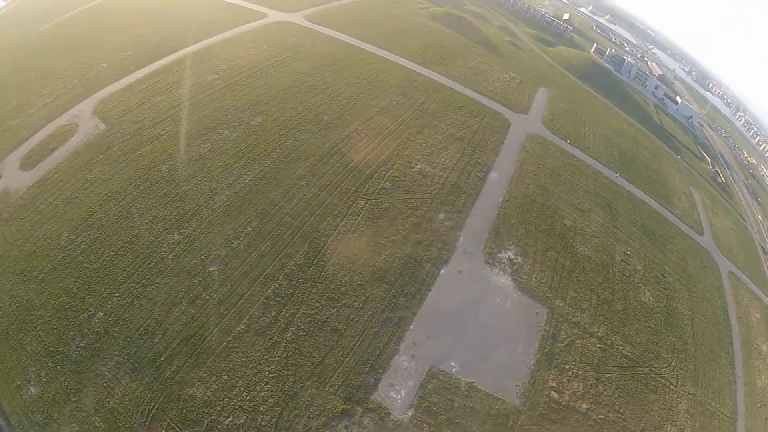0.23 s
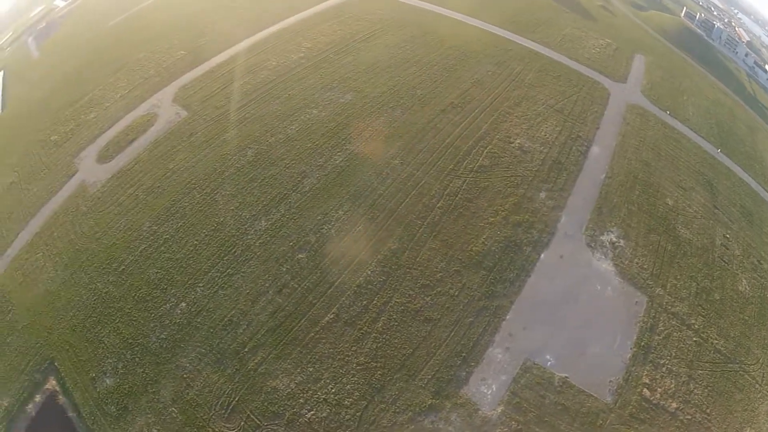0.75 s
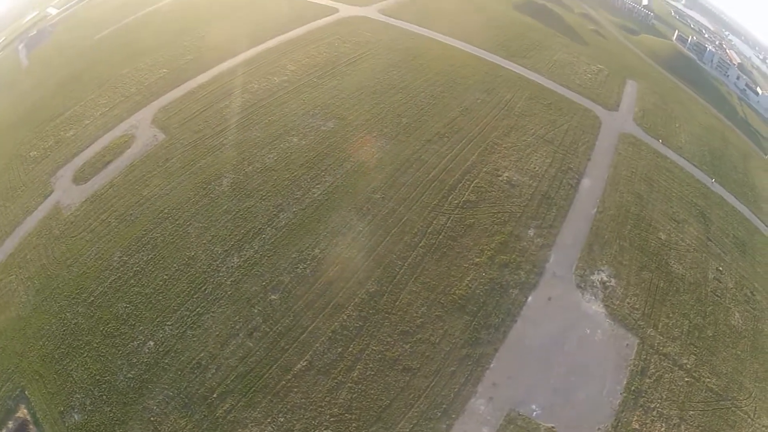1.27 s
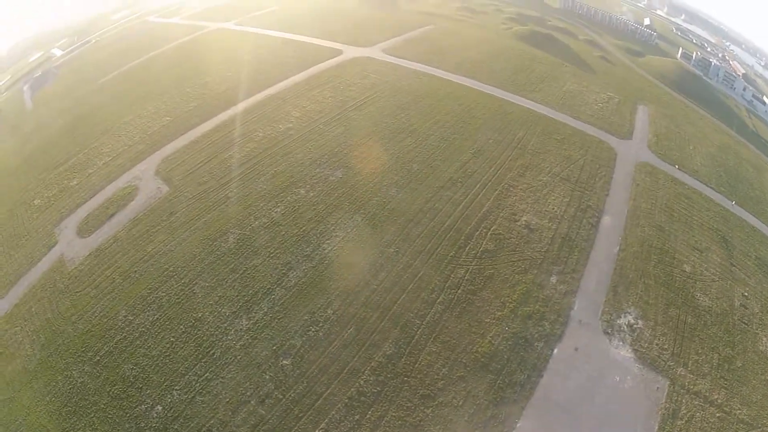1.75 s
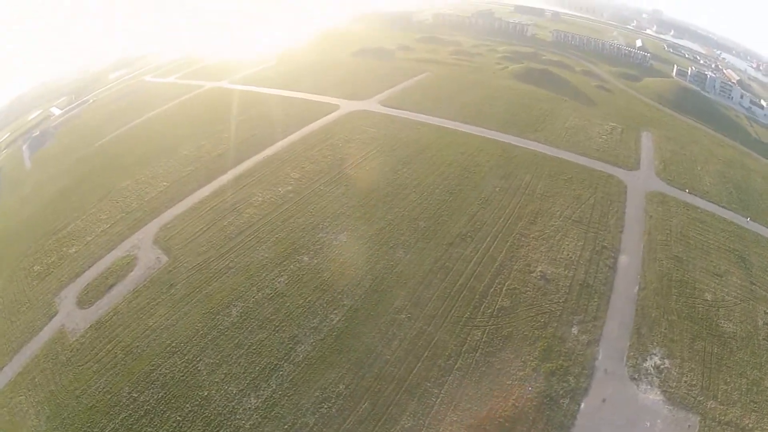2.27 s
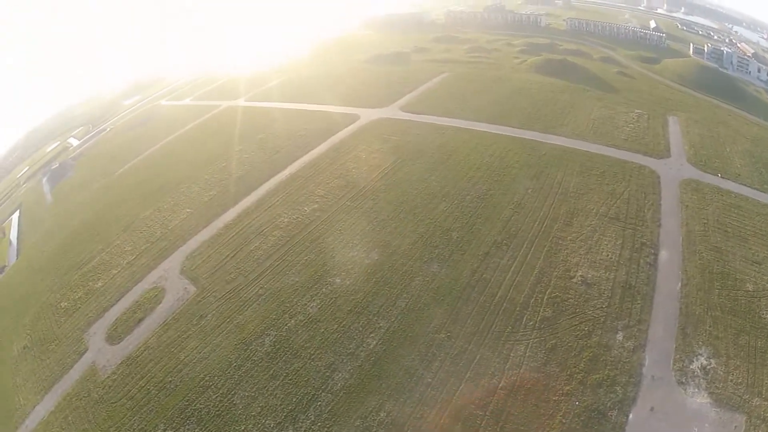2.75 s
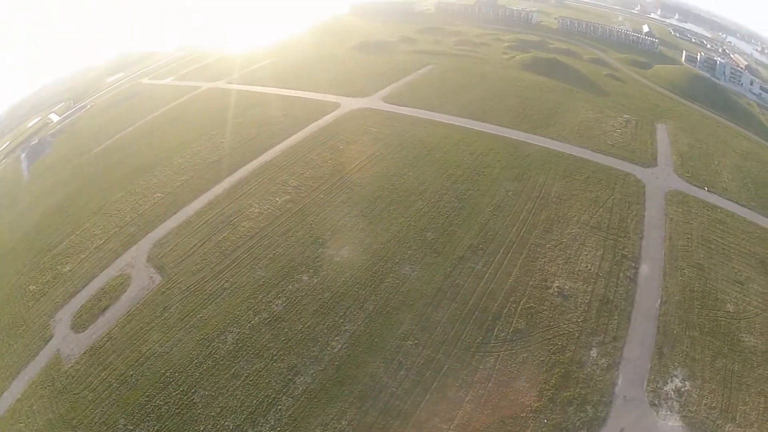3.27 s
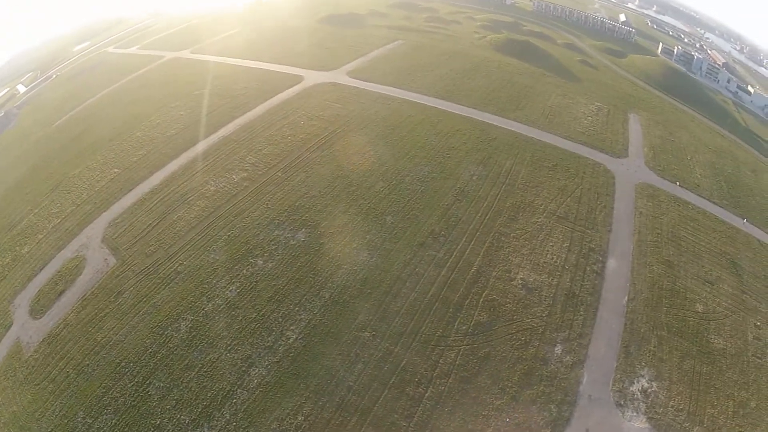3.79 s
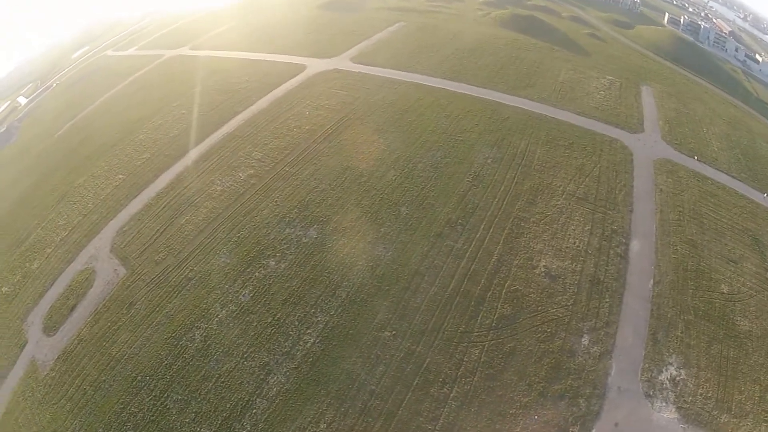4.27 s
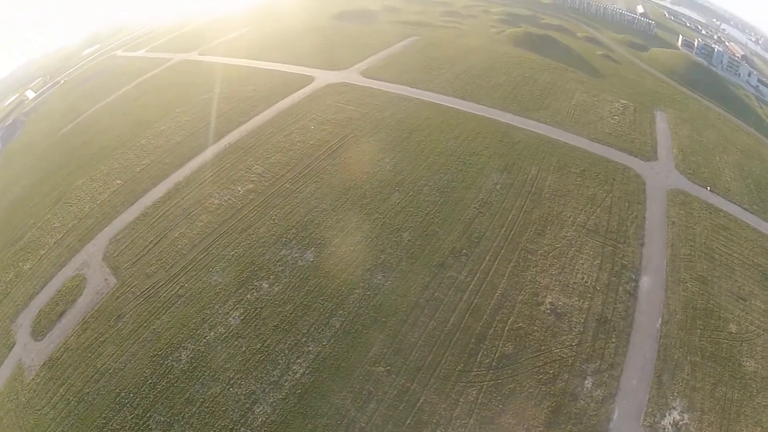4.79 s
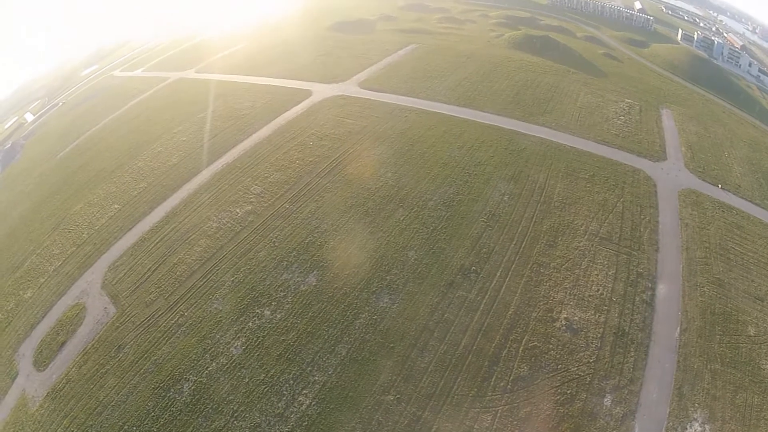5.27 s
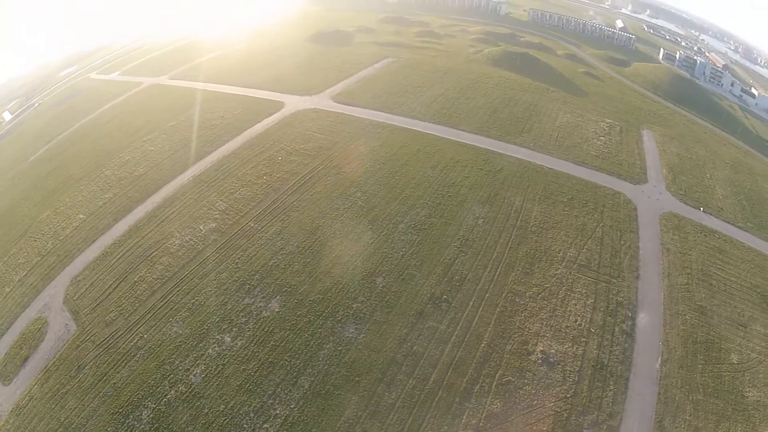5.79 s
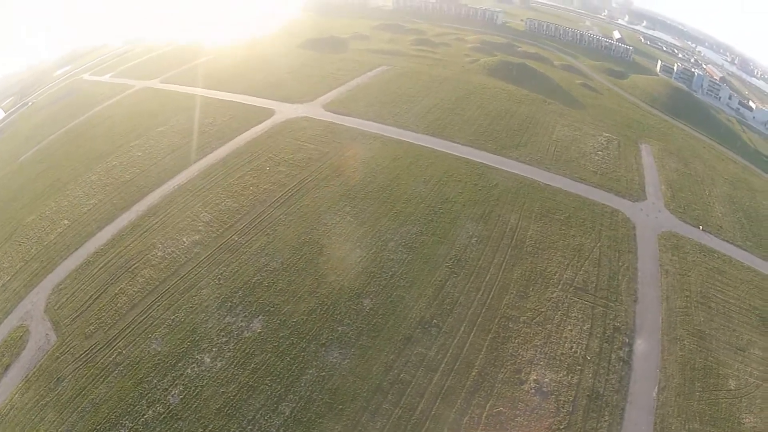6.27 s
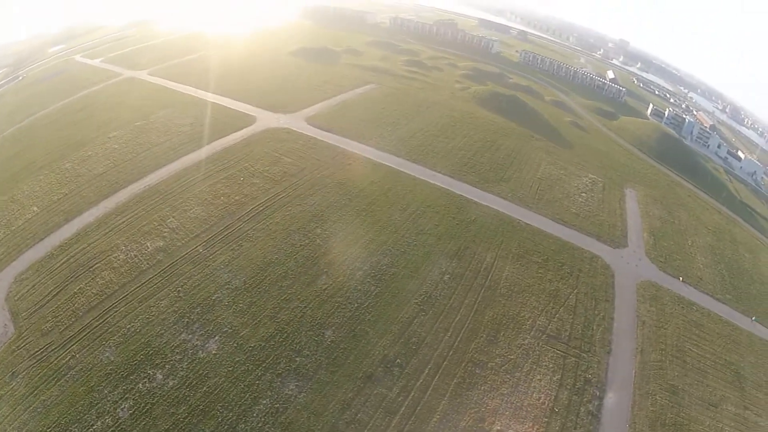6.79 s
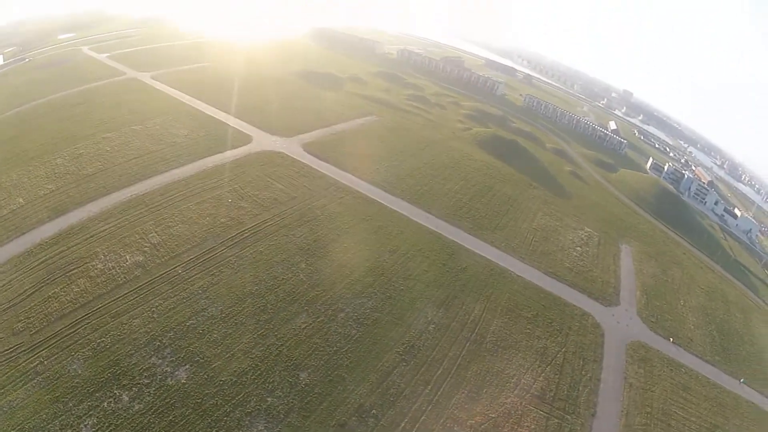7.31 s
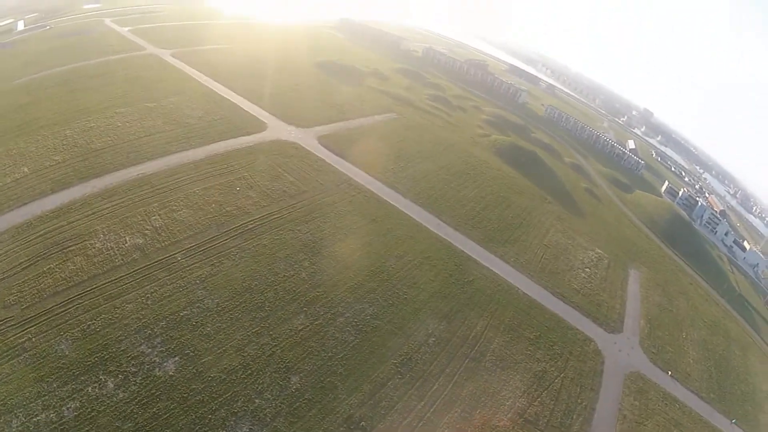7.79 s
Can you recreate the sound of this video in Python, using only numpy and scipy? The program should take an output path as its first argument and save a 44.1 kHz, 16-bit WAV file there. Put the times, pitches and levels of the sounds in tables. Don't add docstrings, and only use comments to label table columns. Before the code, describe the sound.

Close inside a foam model plane in open air, an idling electric motor whines in a rough, beating chord. It holds fairly steady at first, then slides down over an octave to a low, unsteady growl. Air hisses and drums on the hollow body, stronger early and thinner later. From the middle onward, loose parts creak and snap now and then.

```python
import sys
import numpy as np
from scipy import signal
from scipy.fft import rfft, irfft
from scipy.io import wavfile
from scipy.ndimage import uniform_filter1d

SR = 44100
rng = np.random.default_rng(int(sys.argv[2]) if len(sys.argv) > 2 else 0)


def attenuation_scalar(level_db):
    decades = np.asarray(level_db, float) / 20
    return 10 ** decades


def to_wav(s):
    ch = np.atleast_2d(s).T
    pcm = np.round(np.clip(ch, -1, 1) * 32767)
    wavfile.write(sys.argv[1], SR, pcm.astype(np.int16))


N = 355005
TIME_S = np.arange(N) / SR
HZ = np.fft.rfftfreq(N, 1 / SR)

# start_s [s], speed [turns/s]
SHAFT_SPEED = [(0.0, 10.421), (0.83, 9.798), (1.6, 9.96), (1.84, 10.17), (2.19, 10.321), (2.5, 10.004),
               (2.9, 9.772), (3.41, 8.69), (3.8, 8.021), (4.2, 7.336), (4.52, 7.009), (5.14, 6.81),
               (5.4, 6.6), (5.65, 6.258), (6.08, 5.778), (6.5, 5.124), (7.36, 4.468), (8.05, 3.597)]
COG_ORDERS = [37, 29, 31, 33, 35, 38, 39, 41]
COG_LEVELS = [0, -19, -17, -12, -8, -18, -10, -16]
POLE_ORDERS = [60, 59, 61, 62, 63]
POLE_LEVELS = [-6, -3, -6, -12, -13]
MINOR_ORDERS = [3, 4, 24, 25, 34, 49, 50, 51, 71, 75, 76, 80, 83, 95]
MINOR_LEVELS = [-15, -22, -8, -10, -10, -14, -19, -21, -17, -9, -18, -10, -16, -10]
# pitch_hz [Hz], level_db [dB]
MOUNT = [(135, -42), (174, -30), (203, -45.5), (228, -32.5), (253, -28), (288, -17.5), (364, -22.5),
         (390, -31.5)]
# pitch_hz [Hz], level_db [dB]
MOUNT_HIGH = [(220, -47.5), (280, -40.5), (340, -41.5), (400, -56.5), (480, -55), (540, -51), (605, -43.5),
              (770, -53.5)]
# pitch_hz [Hz], width_hz [Hz], lift_db [dB]
SIDE_PANEL = (280, 40, 4.5)
# pitch_hz [Hz], width_hz [Hz], level_db [dB]
AIRFRAME_MODES = [(142.5, 55, -11.5), (171, 21, -8), (223, 54, -8.5), (283.6, 70, -1), (325, 21.7, -4.5),
                  (359, 42, -13), (462, 96, -25.5), (575.7, 116, -23.5), (840, 330, -36.5),
                  (977, 48, -32.5)]
# pitch_hz [Hz], width_hz [Hz], level_db [dB]
WING_MODES = [(30.8, 16, -4.5), (48.5, 20, -2.5), (92, 220, -19.5)]
# start_s [s], level_db [dB]
AIRFLOW = [(0, -44), (.7, -44), (1.64, -41), (2.7, -43), (3.27, -47.5), (4.3, -46.5), (4.95, -46),
           (5.8, -48), (6.05, -47), (6.35, -48.5), (6.65, -46.5), (7.5, -48.5), (8.05, -50.5)]
# speed [turns/s], level_db [dB]
WAKE = [(3.6, -38.5), (4.9, -30.5), (6, -29), (7.6, -25.5), (9.9, -23.5), (10.4, -27)]
# pitch_hz [Hz], level_db [dB per Hz]
HISS_COLOUR = [(410, -17), (700, -9.5), (794, -12), (959, -5.5), (1160, -11.5), (1370, -7), (1540, -10.5),
               (1880, -10.5), (3190, -8.5), (3620, -12.5), (4140, -14), (5190, -15), (5990, -24.5),
               (7790, -76), (13200, -120)]
# pitch_hz [Hz], width_hz [Hz], lift_db [dB]
AIR_POCKETS = [(1395, 52, 2), (1900, 400, 3.5), (3634, 360, 9)]
# centre_s [s], lift_db [dB]
GUSTS = [
    (.88, 3.8),
    (1.65, 2),
    (2.35, 2.9),
]
# [panel knock, dB]
CREAKS = [(3.53, -38, 1880, -34), (3.59, -35.5, 1900, -32), (3.667, -35.5, 3000, -37),
          (4.378, -41, 1900, -47), (4.46, -40, 3550, -47), (4.806, -36, 1900, -54),
          (5.25, -40.5, 1900, -47), (5.47, -43, 5400, -72), (5.848, -40, 1810, -43),
          (6.201, -36, 1900, -40), (6.49, -53, 1900, -49), (6.766, -34, 1900, -42), (7.087, -47, 1670, -43),
          (7.75, -41, 1900, -56)]


def in_time(rows):
    return np.interp(TIME_S, *np.transpose(rows))


def at_hz(points, hz):
    corners_hz, levels_db = np.transpose(points)
    return np.interp(np.log(hz), np.log(corners_hz), levels_db)


def drift(rate_hz):
    step = 40
    pole = np.exp(-2 * np.pi * rate_hz * step / SR)
    white = rng.standard_normal(N // step + 2002)
    slow = signal.lfilter([1], [1, -2 * pole, pole * pole], white)[2000:]
    return np.interp(np.arange(N) / step, np.arange(len(slow)), slow / slow.std())


def response(modes, hz):
    return np.sqrt(sum(attenuation_scalar(2 * level_db) / (1 + (2 * (hz - pitch_hz) / width_hz) ** 2) ** 3
                       for pitch_hz, width_hz, level_db in modes))


def noise(gain):
    x = irfft(rfft(rng.standard_normal(N)) * gain, N)
    return x / x.std()


def shaft_turns():
    return np.cumsum(in_time(SHAFT_SPEED)) / SR


def orders(multiples, levels_db, start_turns, flicker_db):
    speed = in_time(SHAFT_SPEED)
    angle = 2 * np.pi * (shaft_turns() + start_turns)
    gain = response([*AIRFRAME_MODES, *WING_MODES], HZ)
    sines, answers = [], []
    for multiple, level_db in zip(multiples, levels_db):
        level = np.sqrt(2) * attenuation_scalar(level_db + flicker_db * drift(5.3))
        sines.append(level * np.cos(multiple * angle))
        answers.append(np.interp(multiple * speed, HZ, gain))
    return np.array(sines), np.array(answers)


def cogging():
    speed = in_time(SHAFT_SPEED)
    lead = COG_ORDERS[0]
    sines, answer = orders(COG_ORDERS, COG_LEVELS, -.455, flicker_db=1.8)
    sides = np.where(np.array(COG_ORDERS) > lead, -1, 1)[:, None]
    pitch_hz, width_hz, lift_db = SIDE_PANEL
    offset = 2 * (np.outer(COG_ORDERS[1:], speed) - pitch_hz) / width_hz
    sines[1:] *= attenuation_scalar(lift_db / (1 + offset ** 2))
    chord = np.sum(sides * sines * np.minimum(answer / answer[0], 1), axis=0)
    return attenuation_scalar(at_hz(MOUNT, lead * speed)) * chord


def cogging_partner():
    speed = in_time(SHAFT_SPEED)
    order, even_turns_per_s, null_hz = 36, 4.8, 203
    level_db = at_hz(MOUNT, order * speed) - 3.8 * np.maximum(speed - even_turns_per_s, 0)
    turned = np.tanh((null_hz - order * speed) / 4)
    return turned * attenuation_scalar(level_db) * orders([order], [0], -.4574, flicker_db=1.6)[0][0]


def motor():
    speed = in_time(SHAFT_SPEED)
    upper_order = 73
    upper_db = at_hz(MOUNT_HIGH, upper_order * speed) + 2
    upper = attenuation_scalar(upper_db) * orders([upper_order], [0], -.455, flicker_db=1.5)[0][0]
    pole_start_turns = .16
    pole_db = at_hz(MOUNT_HIGH, POLE_ORDERS[0] * speed)
    pole_sines, _ = orders(POLE_ORDERS, POLE_LEVELS, pole_start_turns, flicker_db=.7)
    poles = attenuation_scalar(pole_db) * np.sum(pole_sines, axis=0)
    minor_sines, answer = orders(MINOR_ORDERS, MINOR_LEVELS, pole_start_turns, flicker_db=1.5)
    minor = attenuation_scalar(-26) * np.sum(minor_sines * answer, axis=0)
    return cogging() + cogging_partner() + upper + poles + minor


def airflow_swing():
    flow_db = in_time(AIRFLOW)
    return flow_db - flow_db.mean()


def wing_flex():
    level_db = -41 + 0.45 * airflow_swing() + 0.5 * drift(4.8)
    return attenuation_scalar(level_db) * noise(response(WING_MODES, HZ))


def wake_buffet():
    blades, start_turns, depth = 2, .05, .22
    level_db = np.interp(in_time(SHAFT_SPEED), *np.transpose(WAKE))
    pulse = 1 + depth * np.cos(2 * np.pi * blades * (shaft_turns() + start_turns))
    return pulse * attenuation_scalar(level_db + 0.77 * drift(6.5)) * noise(response(AIRFRAME_MODES, HZ))


def air_hiss():
    corners_hz, levels_db = np.transpose(HISS_COLOUR)
    colour_db = np.interp(np.log(HZ + 1), np.log(corners_hz), levels_db, left=-90)
    for pitch_hz, width_hz, lift_db in AIR_POCKETS:
        colour_db += lift_db / (1 + (2 * (HZ - pitch_hz) / width_hz) ** 2)
    high = 1 / (1 + (2800 / (HZ + 1)) ** 8)
    top_db = -12.5 + 0.19 * airflow_swing()
    gust_half_s = .035
    for centre_s, lift_db in GUSTS:
        top_db = top_db + lift_db * np.exp(-((TIME_S - centre_s) / gust_half_s) ** 2)
    shared_db = 0.18 * drift(2.6)
    low_hiss = attenuation_scalar(shared_db + 0.54 * drift(33)) * noise(attenuation_scalar(colour_db) * (1 - high))
    top_hiss = attenuation_scalar(top_db + shared_db + 0.65 * drift(18)) * noise(attenuation_scalar(colour_db) * high)
    return attenuation_scalar(in_time(AIRFLOW) + 1.5) * (low_hiss + top_hiss)


def creaks():
    out = np.zeros(N)
    t = np.arange(2000) / SR
    swell = (1 - np.exp(-t / 0.0013)) ** 2
    for start_s, level_db, pitch_hz, knock_db in CREAKS:
        rough = uniform_filter1d(rng.standard_normal(len(t)), size=20)
        tones = np.sin(2 * np.pi * pitch_hz * t) + 0.56 * np.sin(2 * np.pi * 0.66 * pitch_hz * t)
        ring = attenuation_scalar(level_db + 9.0) * np.exp(-t * pitch_hz / 7.5) * (1 + 1.4 * rough) * tones
        panel = np.sin(2 * np.pi * 600 * t) + 0.24 * np.sin(2 * np.pi * 980 * t)
        knock = attenuation_scalar(knock_db + 13.5) * np.exp(-t / 0.0047) * panel
        grit = uniform_filter1d(rng.standard_normal(len(t)), size=10)
        crack = attenuation_scalar(level_db + 1.0) * np.exp(-t / 0.0022) * grit
        first = round(start_s * SR)
        out[first:first + len(t)] += swell * (ring + knock + crack)
    return out


def scene():
    air = wing_flex() + wake_buffet() + air_hiss()
    return (motor() + air + creaks())[None]


def top_cut(x):
    return signal.sosfilt(signal.butter(12, 15890, fs=SR, output="sos"), x)


def record(dry):
    sampled_hz, held_hz, top_hz = 12000, 48000, 15290
    slow = signal.resample_poly(dry, sampled_hz, SR, axis=1, padtype="reflect")
    held = np.repeat(slow, held_hz // sampled_hz, axis=1)
    smooth = signal.resample_poly(held, SR, held_hz, axis=1, padtype="reflect")[:, :N]
    low_pass = signal.ellip(12, .1, 70, top_hz, fs=SR, output="sos")
    mix = signal.sosfiltfilt(low_pass, smooth)
    return top_cut(mix)


dry = scene()
out = record(dry)
to_wav(out)
```